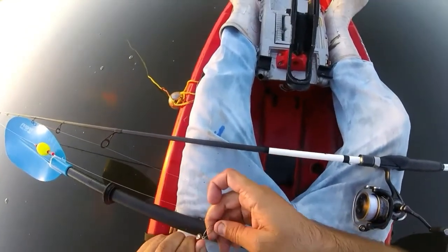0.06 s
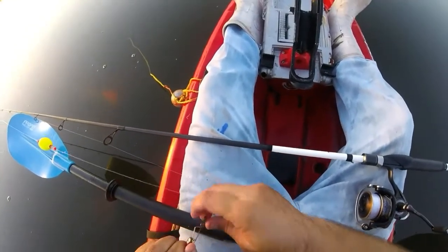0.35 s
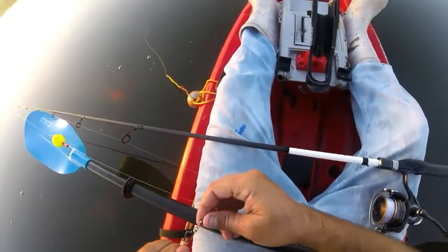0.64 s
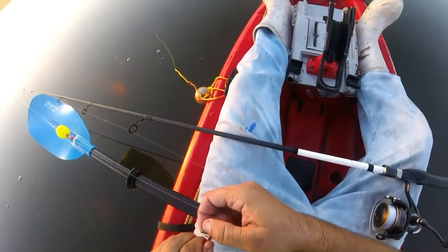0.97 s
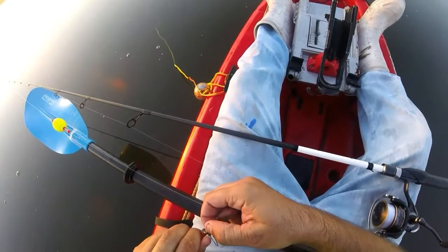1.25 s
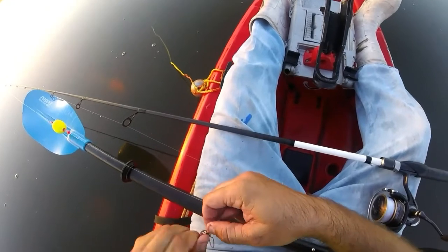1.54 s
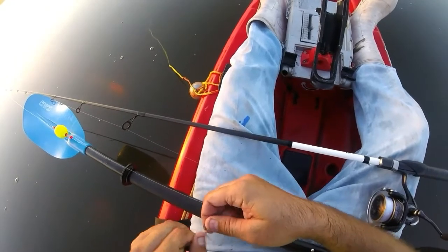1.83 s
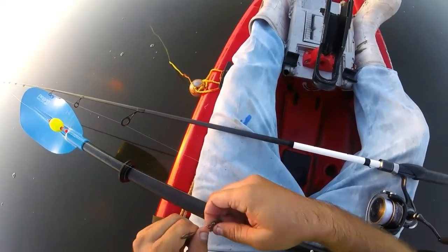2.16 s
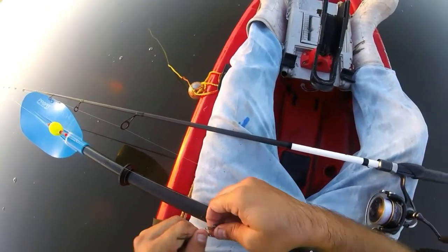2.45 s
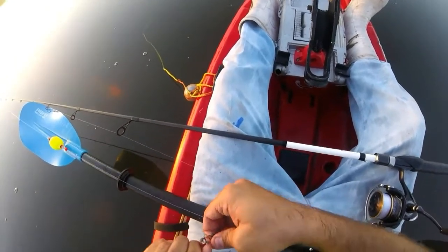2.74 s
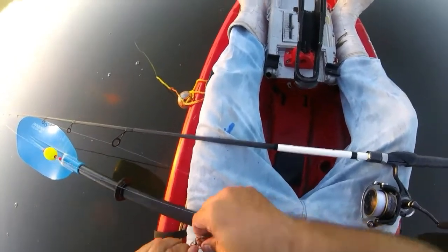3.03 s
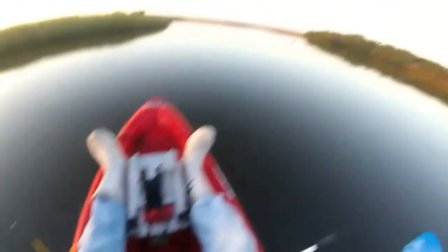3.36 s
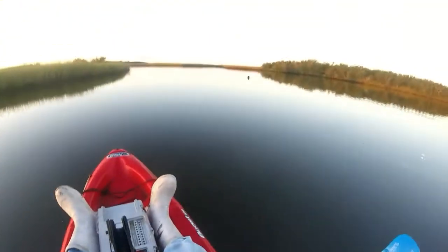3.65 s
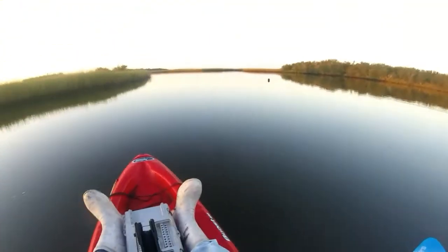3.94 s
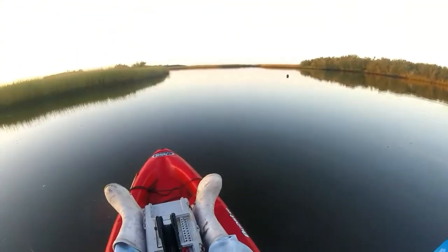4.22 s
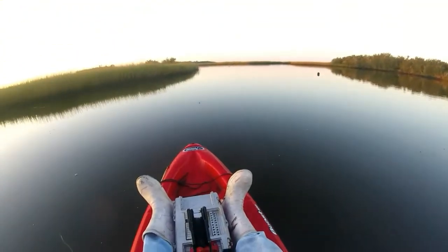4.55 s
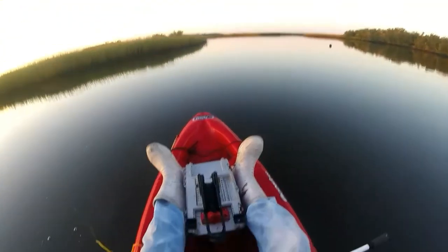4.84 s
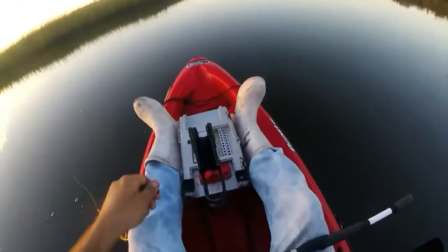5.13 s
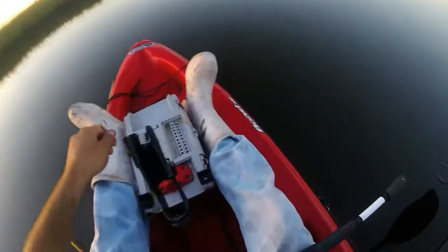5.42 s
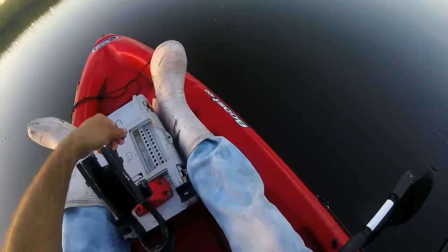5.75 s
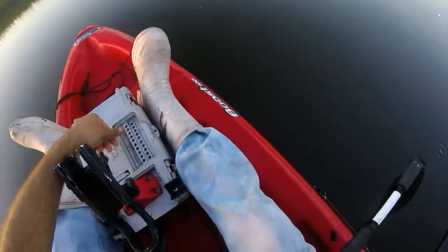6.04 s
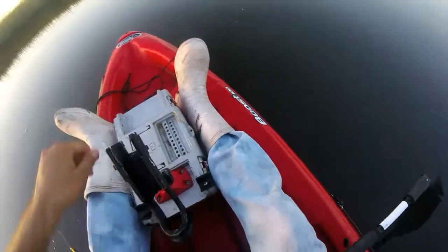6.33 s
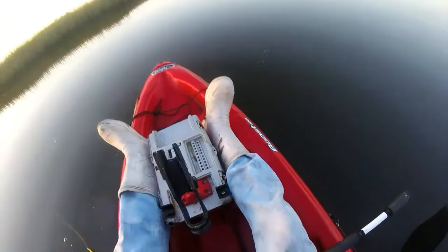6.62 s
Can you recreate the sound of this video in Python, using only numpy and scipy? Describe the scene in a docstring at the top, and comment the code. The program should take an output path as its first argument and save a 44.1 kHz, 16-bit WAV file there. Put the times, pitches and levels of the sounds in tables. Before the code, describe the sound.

Close, dry handling sounds come from a plastic kayak on calm water, over a soft rumble of air and faint hiss. Hollow thumps of rod and paddle come in bunches, with light ticks of tackle and short scratchy slides between them. Late on, a loud, sharp click rings out among the knocks and the sound cuts out for an instant. Soft fumbling and a ringing knock follow.

```python
"""Fishing tackle in a plastic kayak

Rod and paddle strike the hollow hull and excite its modes; sliding shafts, line and cloth scratch by
stick-slip friction; hooks and small parts click and ring, close to a body-worn camera with a resonant case.
Beneath lie a low rumble of air, a thin hiss and a far insect. The sound cuts out once for a moment."""
import sys
import numpy as np
from scipy import signal
from scipy.fft import rfft, irfft
from scipy.io import wavfile
from scipy.ndimage import uniform_filter1d

SR = 44100
rng = np.random.default_rng(int(sys.argv[2]) if len(sys.argv) > 2 else 0)


def store_pcm(level_fs):
    """Save levels as 16-bit WAV."""
    pcm = np.round(np.clip(level_fs, -1, 1) * 32767).astype(np.int16)
    wavfile.write(sys.argv[1], SR, np.atleast_2d(pcm).T)


N = 298998
TIME = np.arange(N) / SR

# spectral density of the air noise: frequency_hz, relative_db
AIR_SPECTRUM = [(12, -47), (20, -11), (70, -2), (177, -13.5), (248, -16.5), (310, -22), (347, -17.5),
                (388, -23.5), (422, -22.5), (459, -24.5), (897, -31), (1120, -35.5), (4060, -41),
                (5530, -40), (16000, -63)]
# humps and dips in the hiss: centre_hz, width_hz, gain_db
HISS_HUMPS = [(4160, 2300, -7), (4930, 450, 5.5), (5550, 170, -1), (6540, 360, 9)]
# slow swell of the air: time_s, gain_db
AIR_SWELL = [(0, 1), (1.1, 2), (2.8, 3.5), (4.2, 1), (4.9, 1.5), (5.7, -1), (6.2, 2), (6.78, 2.5)]
# strokes of shaft, line and cloth: start_s, length_s, scratch_db, drone_db, tilt_db_per_octave
SLIDES = [ (.01, 0.073, -55.5, -47, -1.5), (0.696, 0.038, -47.5, -47.5, -4.5),
          (1.305, 0.076, -48, -35, -1.5), (1.361, 0.049, -42.5, -37, -2.5), (1.473, .075, -39.5, -30.5, 0),
          (1.536, .16, -46.5, -35, 0.5), (1.658, 0.087, -59, -39, -.5), (2.072, 0.1, -48.5, -54, -0.5),
          (2.716, 0.35, -53.5, -53, 0), (3.346, 0.32, -60.5, -55, 2), (3.607, 0.072, -47.5, -49, -1.5),
          (3.913, 0.14, -64, -77, 6), (4.158, 0.16, -52.5, -44.5, 0.5), (4.381, 0.12, -51.5, -39, 0.5),
          (5.17, 0.26, -56, -43.5, 5.5), (5.425, .21, -58.5, -46, -4.5), (5.945, 0.11, -57.5, -58, 0.5),
          (6.505, 0.023, -44.5, -50, -4), (6.554, 0.048, -45, -57, -0.5), (6.706, .022, -42.5, -50, -2.5)]
# spectrum of sliding friction: frequency_hz, relative_db
SCRATCH_SPECTRUM = [(100, -23.5), (400, 8.5), (800, 6.5), (1150, 2.5), (1700, 3), (2250, 0.5), (3200, -5.5),
                    (4500, -7), (5800, -11.5), (6400, -6.5), (7300, -15.5), (11000, -25), (14000, -21.5),
                    (16000, -23.5)]
# modes of the hull wall and its air space: frequency_hz, relative_db, t60_s
HULL_MODES = [(112.3, 1.5, 0.19), (156.3, -2.5, 0.23), (191, -4.5, 0.19), (240, 1, 0.11), (289, -3, 0.14),
              (352.3, -4.5, .18), (410.4, 0, 0.079), (478, -7.5, 0.075), (602, -22.5, 0.091),
              (790, -29.5, 0.059), (927, -32, 0.51)]
# resonances of the camera case: centre_hz, width_hz, gain_db
CASE_MODES = [(6230, 200, -11.5), (10160, 510, -5.5), (11800, 110, 2), (12100, 200, -2), (14000, 600, -2)]
# calls of the insect: start_s, length_s, level_db
TRILLS = [(0.364, 0.3, -72), (1.88, 0.31, -72), (2.58, 0.33, -70)]
# touches of hooks and small parts: start_s, level_db, tilt_db_per_octave
CLICKS = [(.693, -32, 0.5), (1.3861, -27, 1), (1.6426, -28, -4.5), (1.9845, -26, 0), (2.383, -31.5, 3),
          (2.4332, -27, 0.5), (2.4705, -30.5, -6.5), (2.546, -27, -2), (2.5868, -27, -2), (3.593, -21, -2),
          (3.6677, -26.5, 1), (4.178, -30.5, -1), (4.233, -29, -3), (4.2678, -27, 1), (4.4446, -31.5, 7),
          (4.473, -28, 2), (4.8598, -33.5, 0.5), (5.008, -28.5, 3), (5.136, -5, 2.5), (5.434, -30.5, 2),
          (5.9691, -20.5, 3), (6.0671, -25.5, 0), (6.5044, -27.5, 9.5), (6.7083, -34, -6.5)]
# spectrum of a light contact: frequency_hz, relative_db
CLICK_SPECTRUM = [(100, -9.5), (700, 7.5), (1300, 3), (2100, 3.5), (3000, 1.5), (4500, -2), (5800, -4),
                  (6450, -3.5), (7300, -14.5), (11000, -26.5), (16000, -12)]
# weight landing on the boat: start_s, level_db, pitch_hz
BOOMS = [(1.155, -21.5, 120), (1.288, -12.5, 125), (3.587, -17, 103), (4.373, -16, 91), (4.526, -22.5, 121),
         (5.084, -16.5, 106), (5.178, -19.5, 115)]
# blows on the hull: start_s, thud_db, pitch_hz, contact_s, rebound_s, clack_db, tilt_db_per_octave
KNOCKS = [ (1.1572, -4, 268, 0.0044, .015, -8, -2.5), (1.2861, -8, 361, 0.005, .016, -11.5, -1),
          (1.346, -15, 265, 0.0018, 0.01, -46, -17), (1.4339, -22, 302, 0.0086, 0.0076, -24, 0),
          (1.471, -3.5, 295, 0.0033, 0.0047, -23.5, 0), (1.504, -18, 290, 0.0066, .015, -30.5, -1),
          (2.158, -32, 186, .004, 0.0073, -38, -6), (2.188, -35.5, 530, 0.008, .005, -40, 1),
          (2.435, -36, 540, 0.0062, 0.0083, -34.5, -3.5), (2.601, -23, 440, 0.003, 0.0033, -28, -3),
          (2.606, -28, 240, 0.0047, .008, -32, -0.5), (2.9208, -24.5, 480, 0.0028, 0.0038, -18, 1.5),
          (2.951, -34, 323, 0.0041, 0.0049, -20.5, 1.5), (3.3389, -15, 261, .0034, .011, -23, 1),
          (3.5821, -3.5, 259.4, 0.0065, 0.021, -23.5, 2), (3.606, -25, 313, 0.0066, .012, -23.5, -1),
          (4.151, -28.5, 393, 0.0064, .011, -29.5, 2.5), (4.220, -29.5, 327, 0.0085, .013, -33, .5),
          (4.308, -33, 370, 0.0043, .012, -45.5, 3), (4.3644, -14, 290, 0.0061, .009, -19, 1),
          (4.5201, -19.5, 222, 0.0039, 0.01, -30, 3.5), (5.0713, -27.5, 392, .008, .005, -24, 1),
          (5.0826, -11, 249, 0.0074, 0.011, -25.5, -1.5), (5.097, -22, 332, .003, 0.0046, -24.5, 0),
          (5.1456, -42, 400, 0.0047, .014, -17, 2), (5.159, -19.5, 303, 0.012, 0.012, -23.5, -2),
          (5.177, -15.5, 219, 0.0073, .012, -22.5, -1.5), (5.253, -29, 330, 0.0075, .004, -29.5, 0),
          (6.3175, -11, 365, 0.0053, 0.025, -18, -1), (6.458, -34.5, 400, .006, .01, -42, -2)]
# spectrum of a hard contact: frequency_hz, relative_db
CLACK_SPECTRUM = [(60, -9.5), (250, 15), (500, 3.5), (800, 6), (1150, -2.5), (1750, 0), (2300, -4.5),
                  (3200, -9.5), (4600, -13), (5800, -14), (6450, -11), (7200, -24), (11000, -26.5),
                  (16000, -26)]
# small parts struck once: start_s, level_db, pitch_hz, rise_s
PINGS = [(1.384, -30, 1780, 0.0021), (2.108, -47.5, 6400, 0.0037), (3.592, -28, 2170, 0.00086),
         (4.221, -38.5, 2130, 0.0014), (4.365, -37, 6400, .0013), (5.071, -39, 6100, 0.00079),
         (5.136, -14, 4300, 0.00024), (5.256, -31, 3145, 0.0011), (6.318, -15.5, 2050, 0.00033),
         (6.3585, -40.5, 6300, 0.00086)]
# runs of loose parts: start_s, length_s, first_gap_s, level_db, fade_db_per_s, pitch_hz, rise_s
CHATTERS = [(1.506, .03, .0118, -22.5, -280, 2190, 0.0011), (1.556, .06, .0143, -29.5, -90, 1880, 0.00071),
            (3.584, .17, 0.024, -41, -60, 6340, 0.0017), (3.862, .07, .056, -52, -10, 6300, 0.0019),
            (4.149, .13, 0.039, -47, -25, 6380, 0.0026)]


def amp(db):
    """Converts decibels to an amplitude ratio."""
    return 10 ** (np.asarray(db) / 20)


def unit_rms(x):
    """Normalises a signal to unit mean power."""
    return x / np.sqrt(np.mean(x ** 2) + 1e-20)


def add(mix, start_s, sound):
    """Superposition: sums a sound into the mix from start_s on."""
    part = mix[max(round(start_s * SR), 0):][:len(sound)]
    part += sound[:len(part)]


def level_at(spectrum, hz):
    """Interpolates a spectrum in decibels along a logarithmic frequency axis."""
    points_hz, db = np.transpose(spectrum)
    return np.interp(np.log(hz + 1), np.log(points_hz + 1), db)


def impulse_response(spectrum, tilt=0, size=1024):
    """Minimum-phase filter of unit energy, tilted in dB per octave between 400 and 5000 Hz."""
    hz = abs(np.fft.fftfreq(size, 1 / SR))
    log_gain = np.log(amp(level_at(spectrum, hz) + tilt * np.log2(np.clip(hz, 400, 5000))))
    response = np.exp(np.conj(signal.hilbert(log_gain)))
    taps = np.fft.ifft(response).real[:size // 2]
    return taps / np.linalg.norm(taps)


def air(base_db=-45.5):
    """Spectrally shaped noise: low rumble and thin hiss swell under one slow envelope."""
    hz = np.fft.rfftfreq(N, 1 / SR)
    humps_db = sum(db / (1 + (2 * (hz - centre) / width) ** 2) for centre, width, db in HISS_HUMPS)
    noise = irfft(rfft(rng.standard_normal(N)) * amp(level_at(AIR_SPECTRUM, hz) + humps_db), N)
    swell_db = np.interp(TIME, *np.transpose(AIR_SWELL))
    return amp(base_db + swell_db) * unit_rms(noise)


def faint_ticks(per_s=26, level_db=-30.5, spread_db=2.4):
    """A Poisson process: sparse, low-passed impulses are heard as faint, dry ticks."""
    occurs = rng.random(N) < per_s / SR
    strength = amp(level_db + spread_db * np.clip(rng.standard_normal(N), -2, 1.5))
    impulses = occurs * strength * rng.choice([-1, 1], N)
    low_pass = impulse_response([(150, 0), (400, -2), (1500, -7), (4000, -14), (7000, -22), (16000, -29)])
    return signal.oaconvolve(impulses, low_pass)[:N]


def slip_snaps(catches, decay_at_2khz_s=0.00054, count=30):
    """Damped oscillation: each catch snaps at a random pitch, and higher pitches die sooner."""
    t = np.arange(300) / SR
    hz = (np.geomspace(500, 15000, count) * rng.uniform(.95, 1.05, count))[:, None]
    age = t / (decay_at_2khz_s * (2000 / hz) ** .6)
    snaps = age * np.exp(-age) * np.sin(2 * np.pi * hz * t)
    snaps *= np.sqrt(hz) / np.linalg.norm(snaps, axis=1, keepdims=True)
    choice = rng.integers(0, count, len(catches))
    out = np.zeros(len(catches))
    for k in np.flatnonzero(catches):
        add(out, k / SR, catches[k] * snaps[choice[k]])
    return out


def hull_response():
    """Modal superposition: the hull rings in decaying sinusoids, a little differently at every spot."""
    t = np.arange(SR // 3) / SR
    hz, db, t60 = np.transpose(HULL_MODES)[:, :, None]
    detune, phase = rng.uniform(-1.095, 1, (2, len(HULL_MODES), 1))
    modes = np.sin(2 * np.pi * hz * (1 + .03 * detune) * t + np.pi * phase)
    ring = (amp(db - 60 * t / t60) * modes).sum(0)
    ring *= 1 - np.exp(-t / 0.0023)  # bending waves take a moment to spread
    return ring / np.linalg.norm(ring)


def rub(length_s, scratch_db, drone_db, tilt, slips_per_s=2400, spread_db=3.5, clump_db=4.0):
    """Stick-slip friction: clumps of tiny catches scratch and drive the hull's modes into a drone."""
    n = int(length_s * SR)
    progress = np.linspace(0, 1, n)
    clumps = amp(clump_db * np.interp(progress * length_s, np.arange(60) * .005, rng.standard_normal(60)))
    stroke = np.sqrt(progress) * (1 - progress) * clumps
    slips = rng.random(n) < slips_per_s / SR
    catches = slips * amp(spread_db * np.minimum(rng.exponential(1, n), 3)) * rng.choice([-1, 1], n)
    drag = unit_rms(stroke * (unit_rms(slip_snaps(catches)) + 0.49 * rng.standard_normal(n)))
    drone = signal.fftconvolve(stroke * catches, hull_response())
    out = amp(drone_db) * np.sqrt(n) * drone / np.linalg.norm(drone)
    add(out, 0, amp(scratch_db) * signal.fftconvolve(drag, impulse_response(SCRATCH_SPECTRUM, tilt)))
    return out


def slides():
    """Sliding friction: shaft, line and cloth drag along the boat."""
    out = np.zeros(N)
    for start_s, *stroke in SLIDES:
        add(out, start_s, rub(*stroke))
    return out


def case_ring(sound):
    """Sympathetic resonance: sharp sounds nearby excite the high, narrow modes of the camera case."""
    return sum(amp(db) * signal.lfilter(*signal.iirpeak(hz, hz / width, fs=SR), sound)
               for hz, width, db in CASE_MODES)


def insect(pitch_hz=5640, pulses_per_s=60, wander_hz=70):
    """Amplitude modulation: a high, slightly unsteady tone pulses in faint trills."""
    out = np.zeros(N)
    for start_s, length_s, db in TRILLS:
        t = np.arange(int(length_s * SR)) / SR
        hz = pitch_hz + wander_hz * unit_rms(uniform_filter1d(rng.standard_normal(len(t)), size=100))
        carrier = np.sin(2 * np.pi * np.cumsum(hz) / SR)
        pulses = 1 + np.sin(2 * np.pi * pulses_per_s * t)
        add(out, start_s, amp(db) * unit_rms(carrier * pulses * np.sin(np.pi * t / length_s)))
    return out


def contact(decay_s, snap, tail_db, tail_s, modes_hz=(500, 1180, 1662, 2380, 3320), width_hz=104):
    """Impact excitation: a snap and a dying rattle ring short, stiff modes that vary with the spot."""
    t = np.arange(SR // 6) / SR
    force = rng.standard_normal(len(t)) * (np.exp(-t / decay_s) + amp(tail_db) * np.exp(-t / tail_s))
    force[0] += snap
    spot_hz = modes_hz * (1 + 0.12 * rng.uniform(-1, 1, len(modes_hz)))
    ring = sum(signal.lfilter(*signal.iirpeak(hz, hz / width_hz, fs=SR), force) for hz in spot_hz)
    return amp(-1) * (force + amp(-2) * ring)


def clicks():
    """Light impacts: hooks and small parts tick together, too weakly to move the hull."""
    out = np.zeros(N)
    for start_s, db, tilt in CLICKS:
        touch = contact(decay_s=0.002, snap=6.0, tail_db=-21, tail_s=0.0072)
        tick = signal.fftconvolve(touch, impulse_response(CLICK_SPECTRUM, tilt))
        add(out, start_s, amp(db) * tick / abs(tick).max())
    return out


def wall_swing(db, hz, rise_s):
    """Heavy damping: the plastic wall swings for only a cycle or two."""
    t = np.arange(SR // 10) / SR
    age = t / rise_s
    return -amp(db) * age * np.exp((1 - age ** 2) / 2) * np.sin(2 * np.pi * hz * t)


def booms(rise_cycles=.65, rock_db=-7.5, ring_db=-30):
    """Whole-body vibration: under a heavy load the boat booms, and rocks about an octave lower."""
    out = np.zeros(N)
    for start_s, db, hz in BOOMS:
        rock_hz = 0.52 * hz
        boom = wall_swing(db, hz, rise_cycles / hz)
        boom += wall_swing(db + rock_db, rock_hz, rise_cycles / rock_hz)
        add(out, start_s, boom)
        add(out, start_s, amp(ring_db) * signal.fftconvolve(boom, hull_response()))
    return out


def clack(db, contact_s, tilt):
    """Hard impact of shaft on plastic: brief contacts give the strongest snap."""
    touch = contact(contact_s, snap=0.025 / max(contact_s, .002), tail_db=-43, tail_s=0.0073)
    return amp(db) * signal.fftconvolve(touch, impulse_response(CLACK_SPECTRUM, tilt))


def knocks(ring_db=-30, ring_delay_s=.0033, wall_hz=270, thud_db_per_s=-650, clack_db_per_s=-1050):
    """Inelastic collision: a blow thuds, clacks and rings the hull, rebounds once and settles in a rub."""
    out = np.zeros(N)
    for start_s, thud_db, hz, contact_s, rebound_s, clack_db, tilt in KNOCKS:
        rise_s = .0015 + 0.39 * contact_s  # a longer contact gives a longer swing
        thud = wall_swing(thud_db, hz, rise_s)
        # the rebound is lower in pitch, and weaker the later it comes
        add(thud, rebound_s, wall_swing(thud_db + thud_db_per_s * rebound_s, .8 * hz, rise_s))
        add(out, start_s, thud)
        add(out, start_s + ring_delay_s, amp(ring_db) * signal.fftconvolve(thud, hull_response()))
        add(out, start_s, clack(clack_db, contact_s, tilt))
        add(out, start_s + rebound_s, clack(clack_db + clack_db_per_s * rebound_s, contact_s, tilt))
        # stiff spots, pitched above the open wall, pass less drone to the hull
        stiffness_loss_db = 20 * np.log2(max(hz / wall_hz, 1))
        settle = rub(length_s=0.08, scratch_db=-53, drone_db=-44.5 - stiffness_loss_db, tilt=-1.9)
        add(out, start_s + rebound_s, amp(0.32 * thud_db) * settle)
    return out


def ping(db, hz, rise_s, split=0.034, grit=.6):
    """Mode splitting: a small part rings at two close pitches, roughened by the rubbing that excites it."""
    t = np.arange(SR // 20) / SR
    ratio = np.array([[1], [1 + split * rng.choice([-1, 1])]])
    modes = amp([[0], [-6]]) * np.sin(2 * np.pi * (hz * ratio * t + rng.random((2, 1))))
    hump = [(hz / 6, -20), (hz / 2, -8), (hz, 0), (hz * 1.25, -9), (hz * 2.1, -16), (hz * 4, -28)]
    rasp = signal.fftconvolve(rng.standard_normal(len(t)), impulse_response(hump))[:len(t)]
    envelope = t / rise_s * np.exp(1 - t / rise_s)
    return amp(db) * envelope * (modes.sum(0) + grit * rasp)


def small_parts(gap_growth=1.027, spread_db=2.5, detune_hz=110):
    """Free vibration: parts ring once, or chatter in runs of uneven touches that slow and weaken."""
    out = np.zeros(N)
    for start_s, *part in PINGS:
        add(out, start_s, ping(*part))
    for start_s, length_s, gap_s, first_db, fade_db_per_s, hz, rise_s in CHATTERS:
        t = 0
        while t < length_s:
            softness, detune = rng.uniform(-1.03, 1, 2)
            db = first_db + fade_db_per_s * t - spread_db * softness
            add(out, start_s + t, ping(db, hz + detune_hz * detune, rise_s))
            t += gap_s
            gap_s *= gap_growth
    return out


def fumble(start_s=5.956, length_s=.17, gap_s=0.04, first_db=-33.5, fade_db_per_s=-25, pitch_hz=364):
    """Soft impacts: a hand at the deck fittings makes hollow bumps, uneven in time and pitch."""
    out = np.zeros(N)
    for t in np.arange(0, length_s, gap_s):
        late, detune = rng.uniform(-0.81, 1, 2)
        bump = wall_swing(first_db + fade_db_per_s * t, pitch_hz * (1 + 0.071 * detune), rise_s=0.0031)
        add(out, start_s + t + 0.0047 * late, bump)
    return out


def scene():
    """Free field: the sources sum in one channel, with no echo over the open water."""
    handling = knocks() + booms() + fumble() + clicks() + small_parts() + slides()
    return (handling + case_ring(handling) + air() + insect() + faint_ticks())[None]


def record(dry):
    """Gating and band limiting: the sound cuts out for a moment, and a low-pass removes the top treble."""
    cut_start_s, cut_end_s, cutoff_hz = 5.273, 5.433, 15950
    gate = uniform_filter1d(1. * ((TIME < cut_start_s) | (TIME > cut_end_s)), size=64)
    low_pass = signal.firwin(255, cutoff_hz, window=("kaiser", 9), fs=SR)
    return signal.oaconvolve(dry * gate, low_pass[None], "same")


dry = scene()
out = record(dry)
store_pcm(out)
```